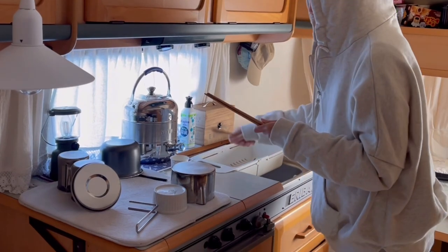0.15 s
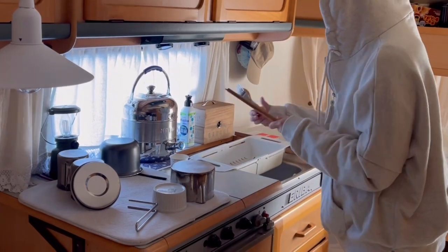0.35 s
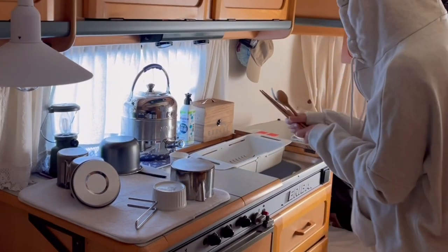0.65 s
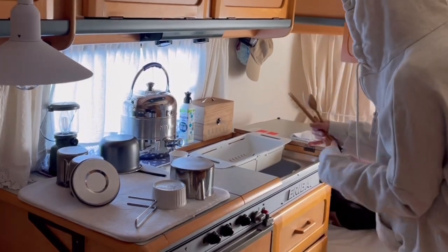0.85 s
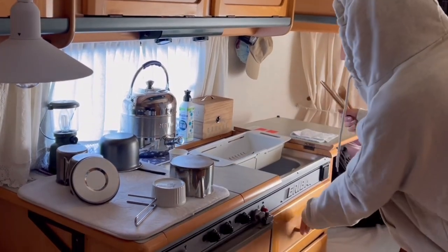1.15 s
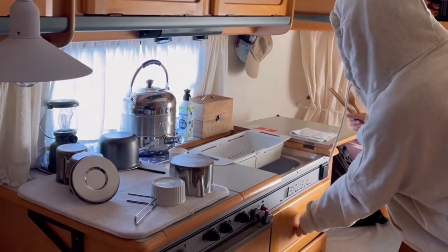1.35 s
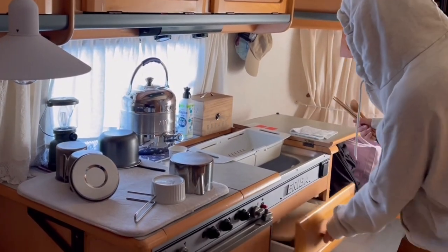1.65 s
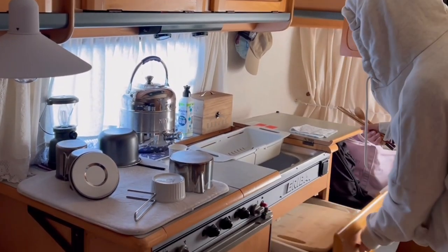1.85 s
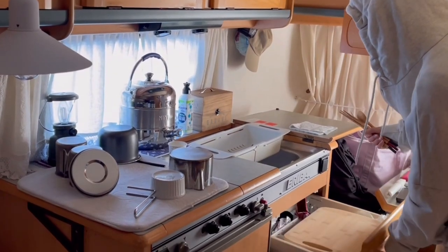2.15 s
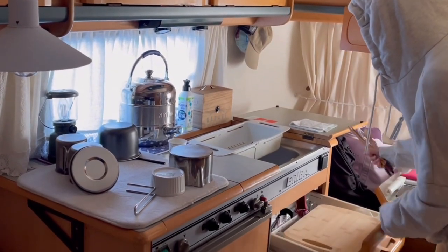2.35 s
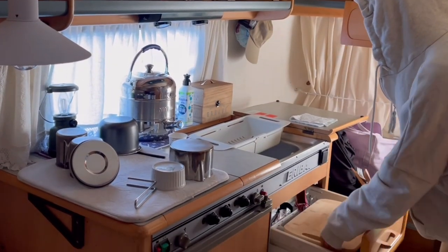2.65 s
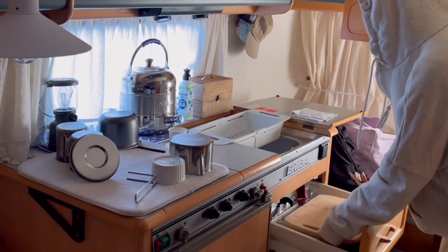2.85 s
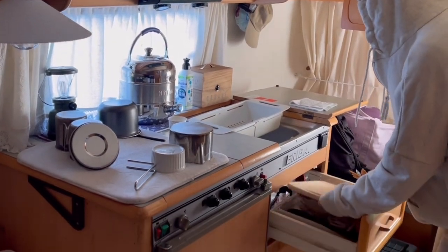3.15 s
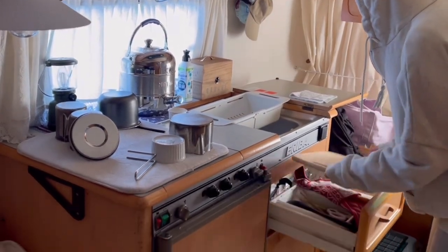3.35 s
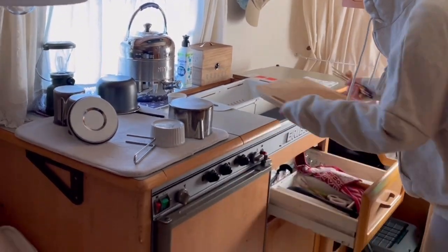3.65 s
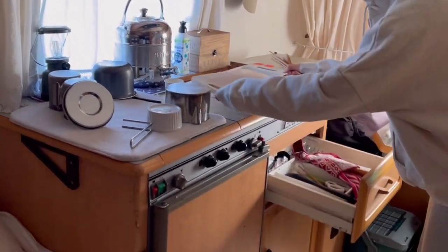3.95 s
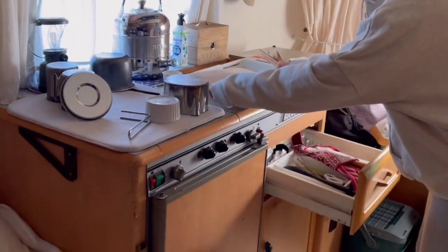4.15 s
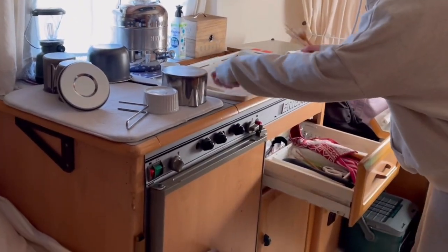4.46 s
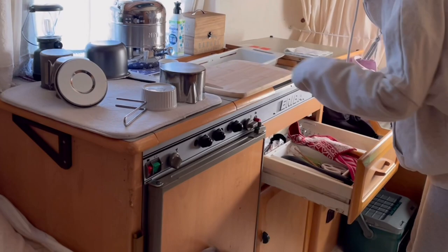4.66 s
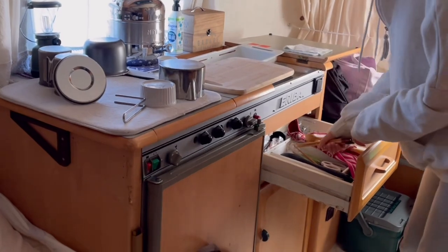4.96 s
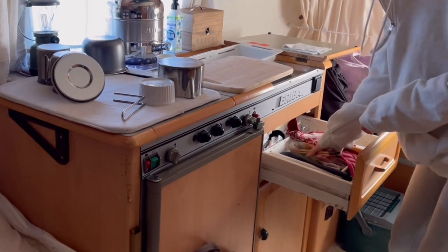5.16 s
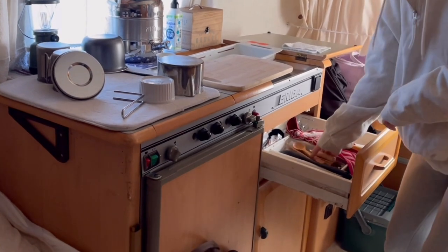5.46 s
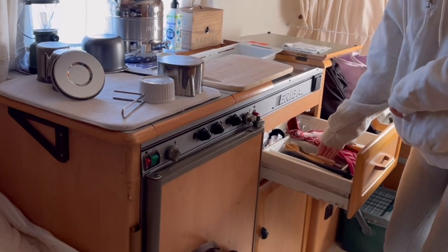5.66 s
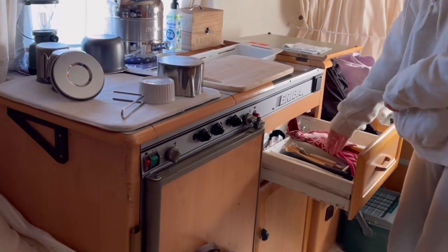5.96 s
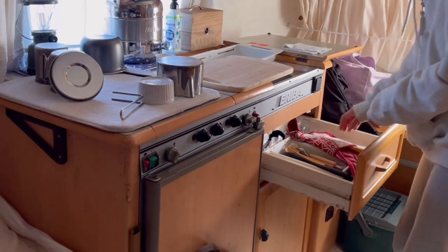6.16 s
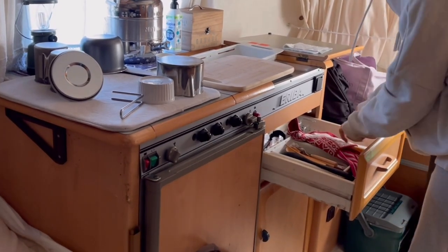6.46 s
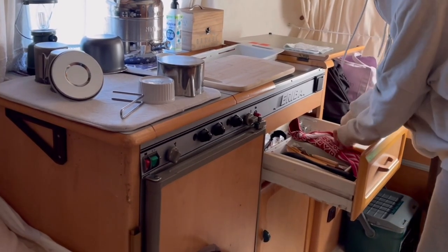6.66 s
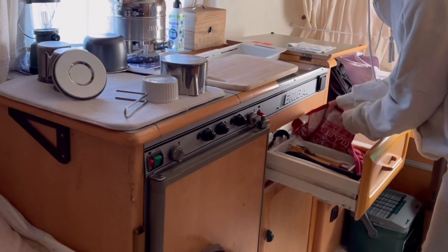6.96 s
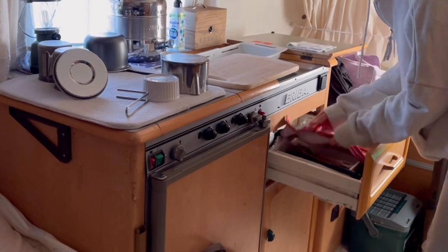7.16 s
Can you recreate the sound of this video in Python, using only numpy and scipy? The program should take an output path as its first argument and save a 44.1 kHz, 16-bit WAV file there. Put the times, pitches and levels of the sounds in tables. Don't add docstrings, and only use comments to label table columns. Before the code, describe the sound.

In a small camper kitchen, light wooden clicks, a drawer knocking open, a cutting board clunking down, a lively rattle of utensils, and soft cloth rustling.

```python
import sys
import numpy as np
from scipy import signal
from scipy.fft import rfft, irfft, next_fast_len
from scipy.io import wavfile
from scipy.ndimage import uniform_filter1d

SR = 44100
rng = np.random.default_rng(int(sys.argv[2]) if len(sys.argv) > 2 else 0)


def unload_wav(signal):
    wavfile.write(
        sys.argv[1],
        SR,
        np.round(np.clip(np.atleast_2d(signal).T, -1, 1) * 32767).astype(np.int16),
    )


def nominal_scale(level):
    x = np.asarray(level, float) / 20
    return 10 ** x


N = 322365
TIME = np.arange(N) / SR
SIZE = next_fast_len(N + SR // 3)
HZ = np.fft.rfftfreq(SIZE, 1 / SR)

# (time [s], tick level [dB], knock level [dB], chatter t60 [s])
HAND = [(0.0657, -40, -60, 0.11), (0.1095, -27, -36, 0.063), (0.1169, -21, -51, 0.069),
        (0.4404, -33.5, -81, 0.042), (0.4718, -44, -52, 0.063), (0.5439, -30, -56, 0.069),
        (0.5725, -28, -56, 0.18), (0.595, -17, -50, 0.02), (0.7796, -42, -80, 0.14),
        (0.8121, -23.5, -73, 0.034), (0.8924, -82, -64, 0.038), (1.2143, -47, -54.5, 0.11),
        (3.6027, -44, -90, 0.079), (3.892, -56, -82, 0.18), (3.9947, -50, -77, 0.22),
        (4.7241, -31.5, -62.5, 0.076), (4.8594, -54, -79, 0.029), (4.9748, -45, -71, 0.04),
        (6.2974, -53, -80, 0.061)]
TRAY = [(5.0644, -27.5, -57.5, 0.17), (5.1055, -27, -55, 0.057), (5.1265, -29, -32.5, 0.013),
        (5.174, -33, -51, 0.024), (5.2015, -38.5, -54, 0.03), (5.2504, -28, -57.5, 0.13),
        (5.2585, -31, -41.5, 0.033), (5.3025, -36.5, -67.5, 0.034), (5.3517, -29, -47.5, 0.028),
        (5.4143, -9, -38, 0.032), (5.4213, -7, -48, 0.025), (5.428, -14.5, -43, 0.13),
        (5.4619, -18.5, -38, 0.06), (5.47, -6, -35, 0.071), (5.4754, -33, -30.5, 0.084),
        (5.484, -15.5, -44.5, 0.2), (5.5327, -22.5, -35.5, 0.14), (5.544, -26.5, -45.5, 0.06),
        (5.5519, -21, -37.5, 0.1), (5.5965, -21.5, -50, 0.1), (5.6218, -20.5, -38, 0.093),
        (5.6644, -26, -40.5, 0.08), (5.6724, -17, -53.5, 0.1), (5.6811, -13.5, -33, 0.062),
        (5.711, -20, -46, 0.094)]
# (time [s], tick level [dB], knock level [dB], carcass level [dB], chatter t60 [s])
DRAWER = [(1.3725, -39, -46.5, -51, 0.063), (1.4084, -70.5, -50, -43.5, 0.3),
          (1.4405, -18, -87, -35.5, 0.046), (1.496, -38, -52, -49, 0.07),
          (1.5356, -33.5, -49.5, -46, 0.095), (1.5885, -42, -66, -56, 0.069),
          (1.6592, -32.5, -55, -63, 0.76), (1.6874, -33, -35.5, -30.5, 0.073),
          (1.7199, -62, -52, -49, 0.068), (2.0547, -18, -28, -26.5, 0.16), (2.0672, -17, -39, -21.5, 0.044),
          (2.084, -19, -38, -41.5, 0.068), (2.0926, -10.5, -26, -24, 0.074),
          (2.1198, -21, -36, -34.5, 0.13), (2.159, -35.5, -41, -54.5, 0.05),
          (2.1795, -37, -70, -63.5, 0.045), (2.315, -33, -40.5, -46.5, 0.058),
          (2.4079, -76, -58.5, -48.5, 0.12)]
RUMMAGE = [(2.6054, -32.5, -46, -41.5, 0.13), (2.646, -15, -40, -56, 0.063),
           (2.8991, -36, -49.5, -42, 0.055), (2.9293, -36, -53, -46, 0.062), (3, -36, -49.5, -37.5, 0.083),
           (3.338, -50, -66, -60.5, 0.1), (6.634, -40.5, -56, -54, 0.088), (6.7309, -53, -58.5, -68, 0.11),
           (7.0198, -35, -40.5, -52, 0.1), (7.0384, -51, -48, -48.5, 0.082),
           (6.573, -44, -67.5, -71.5, 0.17)]
BOARD = [(4.0851, -33, -54, -51.5, 0.09), (4.082, -29.5, -36, -36, 0.034),
         (4.1056, -49, -35.5, -25.5, 0.079), (4.2267, -44, -59.5, -67.5, 0.28),
         (4.3205, -37, -25.5, -28, 0.091), (4.3615, -11.5, -20.5, -23, 0.07),
         (4.3852, -29, -20.5, -25.5, 0.062), (4.401, -26, -33, -34, 0.16), (4.448, -50, -50, -32, 0.021),
         (4.4919, -33.5, -44.5, -49, 0.044), (4.52, -64, -58, -39.5, 0.018),
         (4.5623, -68, -56.5, -76, 0.11), (4.5832, -48, -50.5, -44.5, 0.009),
         (4.6018, -51, -94, -46.5, 0.19), (4.6432, -59, -56, -47, 0.038), (4.8874, -70, -67.5, -48.5, 0.12),
         (4.9142, -80, -55.5, -42.5, 0.195)]
# (frequency [Hz], width [Hz], level [dB])
STICK_BODY = [(222, 80, -20), (950, 28, -20.5), (2430, 140, -5.5), (1560, 64, 2.5), (3016, 58, -2),
              (3800, 540, -8.5), (4660, 75, -11.0), (5200, 68, -16.0), (5245, 350, -9), (6280, 130, -10.0),
              (7680, 170, -8.5), (7900, 31, -24.0), (8980, 54, -1.0), (10500, 180, -10.0)]
DRAWER_BODY = [(215.4, 23.0, 1.0), (330, 44, -11.0), (623, 45, -23), (846, 46, 0.5), (1200, 20, -29.5),
               (1600, 97, -1.0), (2147, 250, 5.0), (3160, 17, -26.0), (2990, 140, 1.0), (3550, 84, -2),
               (5010, 110, -10.5)]
BOARD_BODY = [(197.8, 31, 0), (627, 9.8, -2.5), (1044, 64, -12), (1418, 15, -2.5), (1830, 27, -6),
              (2044, 110, -4.5), (2882, 64, -1.5), (2850, 99, -16.5), (3740, 140, -26), (3443, 140, -21.5),
              (4230, 56, -31.5), (5000, 30, -41.5)]
# (time [s], frequency [Hz], peak level [dB], t60 [s])
HAND_NOTES = [(.068, 4500, -49, .04), (.088, 5540, -51, 0.071), (.11, 3110, -34, 0.044),
              (.125, 2220, -41, 0.033), (.14, 3110, -70, 1), (.475, 2340, -49.5, 0.069),
              (.545, 5000, -41, .04), (.573, 3990, -44, 0.045), (.595, 2510, -33, 0.014),
              (.595, 11670, -38, 0.037), (.812, 5040, -28.5, 0.021), (.812, 2580, -51, 0.034),
              (.894, 2800, -49, 0.016)]
DRAWER_NOTES = [(1.408, 3200, -43, .04), (1.428, 3500, -52, .04), (1.441, 3480, -27, 0.026),
                (1.441, 5000, -33, .04), (1.497, 3660, -36, 0.041), (1.5, 3030, -39, 0.043),
                (1.535, 3430, -49, .03), (1.562, 1560, -49, 0.1), (1.59, 1560, -47, 0.12),
                (1.687, 4610, -33, 0.034), (1.712, 1615, -43, 0.067), (1.77, 1560, -46.5, .06),
                (1.76, 2980, -52, .06), (2.058, 2370, -26.5, 0.058), (2.065, 1845, -25.5, .04),
                (2.082, 3020, -24.5, .05), (2.085, 1490, -29, 0.1), (2.098, 868, -29.5, 0.089),
                (2.1, 3380, -38.5, .05), (2.092, 5000, -38, .04), (2.138, 2600, -38, .04),
                (2.32, 1392, -38.5, .06), (2.646, 2270, -30.5, 0.071), (2.646, 1838, -35.5, 0.079),
                (2.646, 3970, -46, .05), (2.646, 5360, -34.5, .05), (2.646, 8420, -32.5, 0.04),
                (2.646, 11740, -33, .06), (2.547, 8200, -60, 0.012)]
BOARD_NOTES = [(4.084, 588, -37.5, 0.25), (4.086, 1420, -31, 0.062), (4.1067, 1570, -28, 0.028),
               (4.105, 2420, -49, .04), (4.201, 1376, -59.5, 0.18), (4.252, 2980, -60.5, 0.5),
               (4.302, 1950, -59, .1), (4.3195, 1750, -26.5, 0.081), (4.3216, 2150, -18, 0.05),
               (4.3218, 2715, -22, 0.043), (4.322, 3530, -26, 0.04), (4.323, 390, -35.5, 0.091),
               (4.361, 2590, -32, 0.06), (4.365, 974, -26.5, 0.08), (4.388, 1990, -20, 0.055),
               (4.389, 1142, -25.5, 0.1)]
TRAY_NOTES = [(5.065, 3740, -52, 0.064), (5.105, 9000, -36.5, 0.037), (5.127, 1530, -42.5, .05),
              (5.174, 1400, -44.5, .06), (5.202, 3000, -39, 0.028), (5.202, 4040, -46, .04),
              (5.237, 1600, -46.5, .05), (5.259, 1760, -41.5, 0.066), (5.259, 3920, -34.5, 0.038),
              (5.341, 1390, -45.5, .05), (5.36, 6700, -49.5, .04), (5.364, 8800, -47, .04),
              (5.415, 1560, -29.5, 0.035), (5.4152, 8900, -26, .035), (5.422, 6950, -27.5, .05),
              (5.422, 3950, -35.5, 0.067), (5.462, 5300, -34.5, 0.052), (5.47, 8800, -20, 0.042),
              (5.4705, 5200, -19.5, .05), (5.49, 6900, -34, 0.07), (5.533, 3100, -30.5, 0.083),
              (5.533, 5200, -40.5, 0.054), (5.533, 950, -36, .06), (5.597, 7500, -36, 0.038),
              (5.605, 3850, -34, 0.072), (5.622, 3800, -27, 0.032), (5.622, 8500, -36, 0.02),
              (5.673, 8600, -40.5, 0.03), (5.673, 6670, -30, 0.056), (5.684, 2200, -35, 0.0562),
              (5.715, 3600, -38.5, 0.084), (5.715, 8900, -37.5, 0.05)]
RUMMAGE_NOTES = [(2.824, 1470, -50, 0.027), (2.876, 816, -48, 0.028), (2.894, 823, -39.5, 0.033),
                 (2.928, 1560, -54, .04), (3.0, 583, -41.5, 0.12), (3.178, 760, -53, 0.045),
                 (3.468, 11200, -71, .03), (3.605, 4740, -54, 0.024), (3.793, 11400, -61, 0.026),
                 (3.793, 9500, -57, 0.021), (3.793, 8200, -66, .02), (4.015, 8770, -61, .02),
                 (7.02, 776, -47, 0.13), (7.021, 1320, -45, 0.1), (7.249, 700, -52, 0.042),
                 (7.25, 1130, -56, .03)]
# (time [s], frequency [Hz], peak level [dB], swell [s], t60 [s])
SINGING = [(0, 2450, -62, 0.0037, 0.3), (.068, 1210, -50, 0.0028, 0.09), (.1098, 1270, -39, 0.0016, 0.05),
           (1.584, 1896, -46.5, 0.009, 0.052), (1.648, 1586, -41.5, 0.015, 0.096),
           (2.157, 2245, -30, 0.0043, 0.016), (2.607, 924, -42.5, 0.0053, 0.13),
           (4.886, 636, -53, 0.006, 0.09), (6.632, 623, -48.5, 0.0065, 0.046),
           (.115, 5245, -56, 0.015, 0.3), (.61, 3055, -63, 0.039, 0.64), (2.1, 884, -53, .01, 0.5),
           (2.455, 2147, -57, 0.0084, 0.14), (2.455, 3720, -65, 0.018, 0.078),
           (2.455, 5010, -60.5, 0.0094, 0.11), (2.46, 6230, -67, 0.016, 0.08),
           (2.46, 8000, -72, 0.014, 0.07), (2.455, 9600, -70, 0.014, .07), (2.455, 11650, -72, .015, .1),
           (3.68, 3560, -65, 0.082, 0.034), (3.71, 2370, -69, 0.057, 0.03), (3.69, 4880, -74, 0.08, 0.04),
           (4.1, 860, -50, 0.009, 0.58), (4.33, 906, -54, .01, 0.63), (4.725, 5150, -48.5, 0.003, 0.073)]
# (time [s], hold [s], cloth level [dB], scrape level [dB])
STROKES = [(0, 0.0085, -66, -55.5), (0.065, 0.069, -60.5, -86), (0.173, 0.076, -74.5, -66),
           (0.41, 0.12, -79, -66.5), (0.573, 0.14, -73.5, -72), (0.765, 0.076, -69.5, -73),
           (1.044, 0.031, -91, -68), (1.182, 0.084, -107, -94), (1.413, 0.11, -73, -53),
           (1.566, 0.49, -62, -57.5), (2.06, 0.17, -56.5, -56), (2.176, 0.3, -79, -71),
           (2.613, 0.35, -79, -69), (2.868, 0.061, -52.5, -57), (2.954, 0.059, -61.5, -58.5),
           (3.03, 0.23, -53, -60.5), (3.654, 0.24, -81, -84.5), (4.109, 0.061, -77, -52.5),
           (4.332, 0.11, -75, -42), (4.92, 0.028, -98, -67), (5.091, 0.22, -69.5, -58.5),
           (5.337, 0.081, -68, -55.5), (5.516, 0.21, -64, -50), (5.864, 0.07, -110, -76),
           (6.09, 0.33, -110, -82.5), (6.593, 0.14, -51.5, -58.5), (6.813, 0.067, -57.5, -70),
           (6.93, 0.13, -55, -64), (7.082, 0.059, -63.5, -65.5), (7.172, 0.11, -74.5, -73)]
# (time [s], peak level [dB], frequency [Hz], t60 [s])
THUMPS = [
    (0.479, -37, 60.66, 1),
    (1.497, -31.5, 65, 0.27),
    (1.691, -30.5, 76, 0.38),
    (2.071, -21, 101, 0.33),
    (2.11, -13, 52, 0.07),
    (3.592, -37, 59.5, 0.47),
    (4.358, -46.5, 71, 0.26),
    (4.917, -22.5, 60, 0.36),
    (4.937, -19, 51.3, 0.4),
]
# (time [s], carcass rumble level [dB], floor boom level [dB])
SWAY = [(0, -52, -42.5), (.3, -52.5, -49), (.63, -54.5, -43.5), (1.0, -58, -45), (1.45, -54.5, -43.5),
        (2.0, -52.5, -40), (2.6, -63, -49), (2.9, -58.5, -47), (3.4, -62.5, -48.5), (3.9, -67, -48),
        (4.4, -60.5, -44), (4.75, -66, -50), (5.3, -61, -51.5), (5.9, -67, -51.5), (6.5, -68, -52),
        (7.31, -72, -51)]
# (frequency [Hz], phase [rad])
PORT_LEAD = [(400, 0), (1000, -.5), (2500, .2), (4500, .5), (6500, .2), (7900, .8), (8600, 0), (9300, -1.4),
             (10250, -3.14), (11300, -4.9), (12100, -6.2)]
# (frequency [Hz], level [dB])
PORT_DB = [(60, 1), (300, 2), (4000, 2.5), (7200, 3.5), (8200, .6), (12000, 0)]
# (frequency [Hz], coherence [0-1])
PORT_LIKENESS = [(60, .998), (150, .985), (300, .94), (700, .65), (1200, .3), (1700, .4), (3500, .7),
                 (6000, .6), (8500, .9), (9700, .999), (10700, .999), (12000, .85)]
# (frequency [Hz], level [dB])
MIC = [(350, -1), (470, -0.5), (600, 2.5), (3000, -5.5), (6000, -5.5), (7800, -1.5), (8900, 2), (10250, 7),
       (11400, 6), (12300, -15), (13000, -20.5), (15500, -16.5), (16600, -75.5)]


def along(hz, table):
    f, v = np.transpose(table)
    return np.interp(np.log(hz + 1), np.log(f), v)


def curves(table):
    s, *columns = np.transpose(table)
    return [np.interp(TIME, s, c) for c in columns]


def unit(x):
    return x / np.sqrt(np.mean(x ** 2))


def band(x, lo_hz, hi_hz, order=2):
    return signal.sosfilt(signal.butter(order, [lo_hz, hi_hz], "bandpass", fs=SR, output="sos"), x)


def fade(t, t60):
    return np.exp(-np.log(1000) * t / t60)


def walk(rate):
    k = int(SR / rate)
    held = np.repeat(rng.standard_normal(N // k + 1), k)
    return 1.4 * uniform_filter1d(uniform_filter1d(held, k), k)[:N]


def grains(lumpy_db):
    return unit(rng.standard_normal(N) * nominal_scale(lumpy_db * rng.exponential(size=N)))


def contacts(events, body, stretch, ring_db, widen, lumpy_db, snap, dull_hz, rise_s, roam):
    out, t = np.zeros(N + SR), np.arange(8192) / SR
    hz = np.fft.rfftfreq(len(t), 1 / SR)
    impulse = 1. * (t == 0)
    edges = [(2900, 15000), (550, 2900), (120, 550)]
    skirts = [(2900, 15000, 2), (650, 1900, 1), (130, 360, 2)]
    spans = [rfft(band(impulse, *skirt)) / (1 + 1j * hz / dull_hz) for skirt in skirts]
    for s, tick_db, knock_db, carcass_db, t60 in events:
        chance = rng.standard_normal((30, 2))
        lumps = np.repeat(rng.standard_normal(len(t) // 64), 64)
        chatter = rng.standard_normal(len(t)) * nominal_scale(lumpy_db * lumps)
        chatter = chatter * (1 + snap * fade(t, 0.0023)) * np.minimum(t / rise_s, 1)
        levels = (tick_db - 15.0, knock_db, carcass_db)
        for (lo, hi), span, db, longer in zip(edges, spans, levels, stretch):
            modes = [(f * (1 + roam * a), w * widen, d + 3.5 * b)
                     for (f, w, d), (a, b) in zip(body, chance) if lo <= f < hi]
            top_db = max(d for _, _, d in modes)
            answer = 1 + sum(nominal_scale(d - top_db + ring_db) / (1 + 2j * (hz - f) / w) for f, w, d in modes)
            force = chatter * fade(t, max(t60, .008) * longer)
            layer = irfft(rfft(force) * span * answer)
            peak = np.sqrt(uniform_filter1d(layer ** 2, size=200).max())
            out[int(s * SR):int(s * SR) + len(t)] += nominal_scale(db) * layer / peak
    return out[:N]


def shaking(events, carcass_db):
    return [(s, tick_db, knock_db, knock_db + carcass_db, t60) for s, tick_db, knock_db, t60 in events]


def spoons_and_chopsticks():
    events = shaking(HAND, -6.5) + shaking(TRAY, -13.5)
    return contacts(events, STICK_BODY, (0.83, 1.35, 3), ring_db=10, widen=1.8, lumpy_db=4.0,
                    snap=2.6, dull_hz=9000, rise_s=.00055, roam=.03)


def drawer():
    return contacts(DRAWER + RUMMAGE, DRAWER_BODY, (1, 1.47, 2.27), ring_db=7.5, widen=2.0, lumpy_db=0.5,
                    snap=1.2, dull_hz=3520, rise_s=0.00092, roam=0.061)


def board():
    return contacts(BOARD, BOARD_BODY, (0.93, 1.21, 2.9), ring_db=5.0, widen=2.4, lumpy_db=-3.0,
                    snap=.2, dull_hz=3325, rise_s=.005, roam=0.053)


def wooden_notes():
    rows = HAND_NOTES + DRAWER_NOTES + BOARD_NOTES + TRAY_NOTES + RUMMAGE_NOTES
    out, t = np.zeros(N + SR), TIME[:8192]
    for s, hz, db, t60 in rows:
        wobble = uniform_filter1d(rng.standard_normal((2, len(t))), size=100) * 10
        unsteady = 1 + 0.44 * (wobble[0] + 1j * wobble[1])
        mode = np.imag(unsteady * np.exp(2j * np.pi * hz * t))
        shape = np.minimum(t / .002, 1) * fade(t, max(t60, .008))
        out[int(s * SR):int(s * SR) + len(t)] += nominal_scale(db) * mode * shape
    return out[:N]


def tones(rows, rough=0, waver_hz=157):
    out = np.zeros(N + 2 * SR)
    for s, hz, db, swell, t60 in rows:
        t = TIME[:int(min(swell + 1.5 * t60, 1.9) * SR)]
        mode = np.exp(2j * np.pi * hz * t)
        if rough:
            span = int(SR / waver_hz)
            waver = uniform_filter1d(rng.standard_normal((2, SR * 2)), span)[:, :len(t)] * np.sqrt(span)
            mode = mode * (1 + rough * min(1, .08 / t60) * (waver[0] + 1j * waver[1]))
        shape = np.minimum(t / swell, 1) * fade(np.maximum(t - swell, 0), t60)
        out[int(s * SR):int(s * SR) + len(t)] += nominal_scale(db) * mode.imag * shape
    return out[:N]


def singing_fittings():
    return tones(SINGING, rough=0.45)


def stroke_levels():
    rise_db_s, fall_db_s = 699, 416.5
    linger_db, linger_db_s = -20, 120
    t = TIME[::32]
    power = np.full((2, len(t)), 1e-12)
    for s, hold, cloth_db, scrape_db in STROKES:
        before, after = np.maximum(s - t, 0), np.maximum(t - s - hold, 0)
        dying_db = np.maximum(-fall_db_s * after, linger_db - linger_db_s * after)
        shape_db = np.maximum(dying_db - rise_db_s * before, -90)
        power = power + nominal_scale(2 * np.array([[cloth_db], [scrape_db]])) * nominal_scale(2 * shape_db)
    return [np.interp(TIME, t, 10 * np.log10(p)) for p in power]


def cloth(level_db, flutter):
    fibres = grains(2.2)
    weave = band(fibres, 3300, 13000) + 0.54 * band(fibres, 7000, 13000)
    return unit(weave) * nominal_scale(level_db + 1.2 * flutter + 1.3 * walk(90))


def runner(level_db, flutter, snags):
    wood = band(snags, 560, 2700) + 0.49 * band(snags, 1900, 4600)
    wood = wood + .35 * band(snags, 1350, 1650, order=1) + .8 * band(snags, 560, 950, order=1)
    return unit(wood) * nominal_scale(level_db + 1.2 * flutter + 1.2 * walk(60))


def carcass(level_db, snags):
    panels = band(snags, 150, 235, order=3) + .22 * band(snags, 260, 400)
    panels = panels + .08 * band(snags, 110, 600, order=1)
    return unit(panels) * nominal_scale(level_db + 3.0 * walk(9.8))


def floor_boom(level_db, snags):
    springs = band(snags, 50, 79, order=3) + 1.2 * band(snags, 48, 66)
    springs = springs + 0.27 * band(snags, 41, 115, order=4)
    return unit(springs) * nominal_scale(level_db + 1.3 * walk(4.6))


def sliding():
    cloth_db, scrape_db = stroke_levels()
    carcass_db, boom_db = curves(SWAY)
    flutter, snags = walk(45), grains(1.1)
    rubbed = cloth(cloth_db, flutter) + runner(scrape_db, flutter, snags)
    return rubbed + carcass(carcass_db, snags) + floor_boom(boom_db, snags)


def floor_thumps():
    return tones([(s, hz, db, .012, t60) for s, db, hz, t60 in THUMPS])


def stillness():
    noise, sway_db = rng.standard_normal(N), curves(SWAY)[0]
    hum_db = -79.5 + 0.69 * (sway_db - sway_db.mean()) + walk(5.1)
    hiss = band(noise, 2000, 13000) + 0.55 * band(noise, 2600, 7500)
    wash = band(noise, 590, 790) + .2 * band(noise, 820, 3000) + 0.5 * band(noise, 1300, 1700)
    return nominal_scale(-84) * unit(hiss) + nominal_scale(hum_db) * unit(wash)


def two_ports(sound):
    direct, t = rfft(sound, SIZE), TIME[:SR // 3]
    room_t60_s, room_db = 0.055, 0
    diffuse = nominal_scale(room_db) * np.sqrt(np.clip(1 - along(HZ, PORT_LIKENESS), 0, 1))
    echoes = rng.standard_normal((2, len(t))) * fade(t, room_t60_s) * np.minimum(t / 0.0034, 1)
    ahead, across = diffuse * rfft(echoes / np.linalg.norm(echoes[0]), SIZE)
    out = []
    for side in (.5, -.5):
        walls = 0.48 * ahead + 2 * side * across
        near = np.exp(1j * side * along(HZ, PORT_LEAD))
        balance = nominal_scale(side * along(HZ, PORT_DB))
        out.append(irfft(direct * (near + walls) * balance, SIZE)[:N])
    return np.array(out)


def scene():
    struck = spoons_and_chopsticks() + drawer() + board() + wooden_notes() + singing_fittings()
    return two_ports(struck + sliding() + floor_thumps() + stillness())


def band_limit(x):
    return signal.sosfilt(signal.butter(12, 16460, fs=SR, output="sos"), x)


def record(dry):
    heard = irfft(rfft(dry, SIZE) * nominal_scale(along(HZ, MIC)), SIZE)[:, :N]
    return band_limit(heard)


dry = scene()
out = record(dry)
unload_wav(out)
```